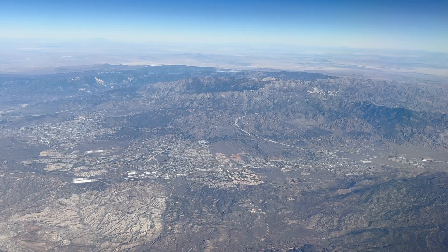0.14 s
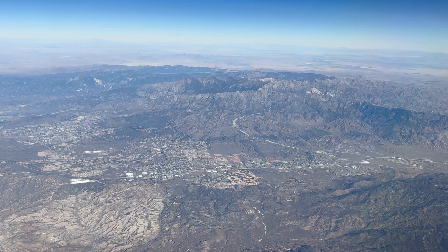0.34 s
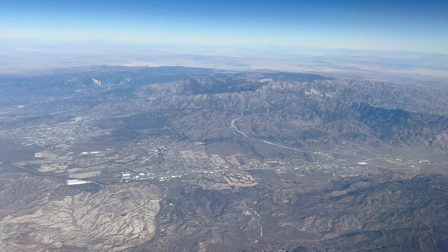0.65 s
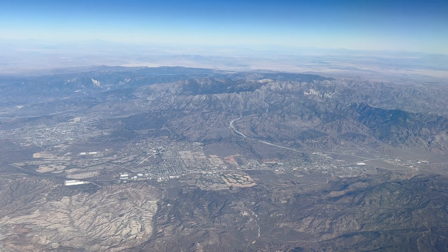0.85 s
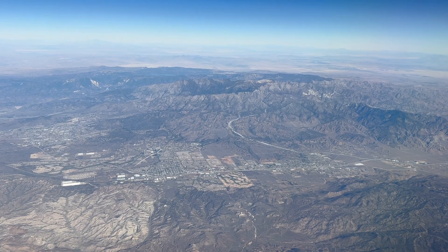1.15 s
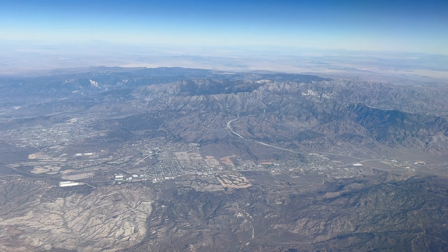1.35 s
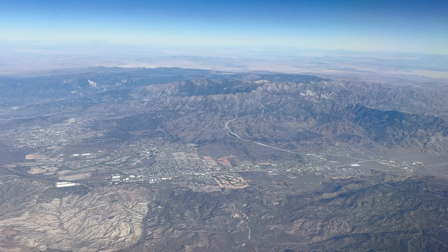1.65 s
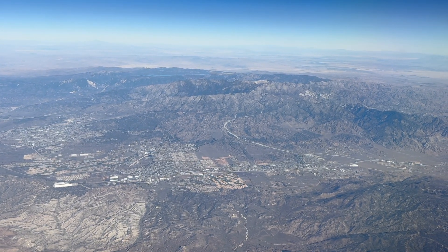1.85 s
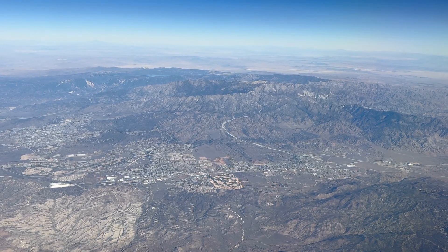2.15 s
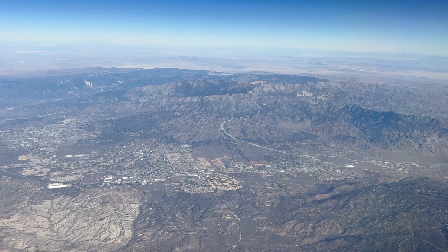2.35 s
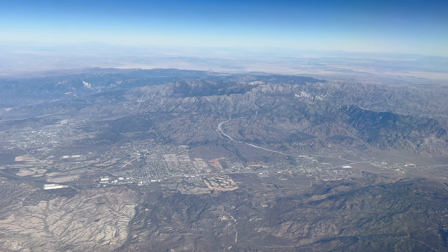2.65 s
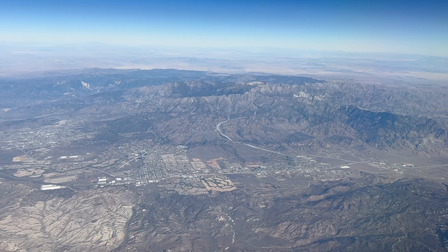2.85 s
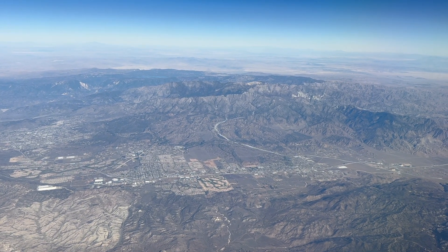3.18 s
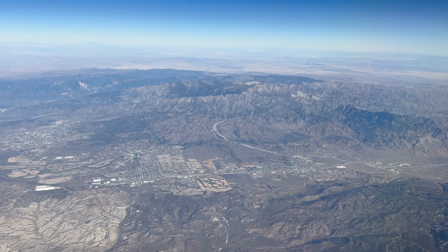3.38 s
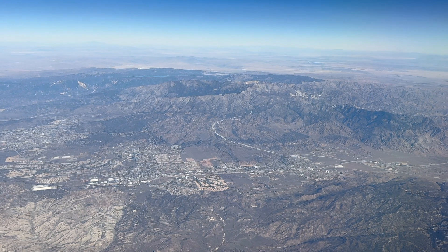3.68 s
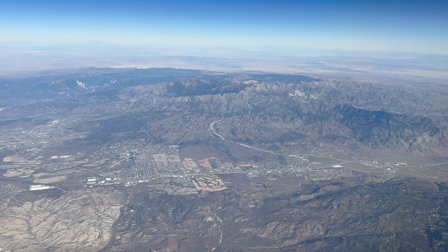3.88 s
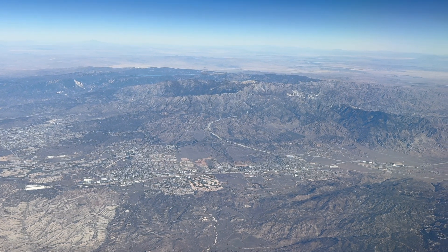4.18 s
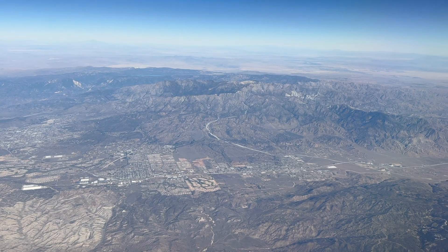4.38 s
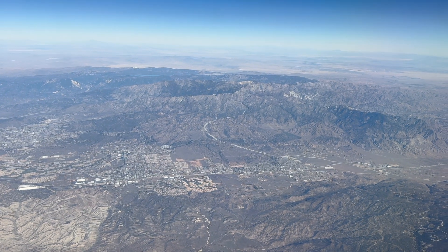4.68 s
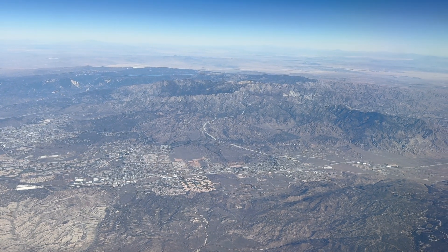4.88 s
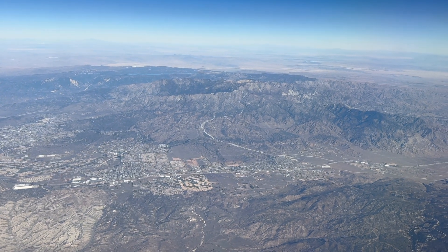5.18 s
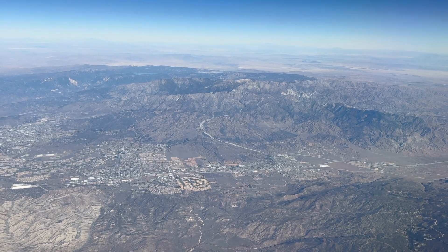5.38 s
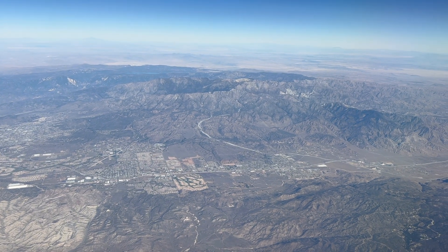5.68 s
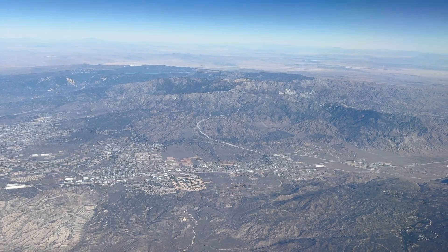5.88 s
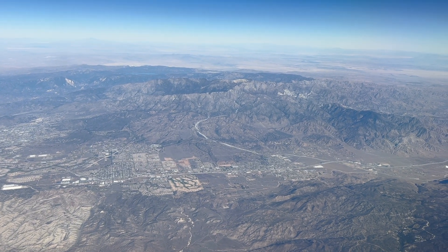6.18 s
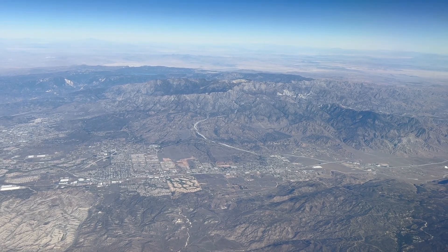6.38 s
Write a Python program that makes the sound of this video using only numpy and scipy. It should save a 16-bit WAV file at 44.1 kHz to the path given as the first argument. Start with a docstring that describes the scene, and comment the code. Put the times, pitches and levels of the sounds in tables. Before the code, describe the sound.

Inside a jet airliner at cruise, heard from a window seat, the airstream rumbles low and steady under droning engines, a high electrical whine, a slowly beating fan tone and soft vent hiss. Early on the fan tone dips briefly, then a sharp plastic click sounds close by. Everything fades down to silence and comes straight back up, with a few very faint clicks and clothing rustles.

```python
"""The airstream rumbles through an airliner's hull at cruise, on a stereo microphone at a window seat.
Around the seat, transformers on the 400 Hz supply whine, two cabin fans beat, engines drone, and the
vents hiss and whistle. Close by are a faint knock, plastic clicks, rustles of clothes and faint squeaks.
An electric load comes on for half a second: the whine swells and one fan sags.
The sound fades down to silence and straight back up, with a slightly different balance."""
import sys
import numpy as np
from scipy import signal
from scipy.fft import rfft, irfft, next_fast_len
from scipy.io import wavfile
from scipy.ndimage import map_coordinates

SR = 44100
rng = np.random.default_rng(int(sys.argv[2]) if len(sys.argv) > 2 else 0)


def persist_wave(psi):
    """Save psi, clipped to +-1, as 16-bit WAV."""
    counts = np.round(np.clip(psi, -1, 1) * 32767).astype(np.int16)
    wavfile.write(sys.argv[1], SR, np.atleast_2d(counts).T)


N = 287973
TIME = np.arange(N) / SR
FFT_SIZE = next_fast_len(N)
BIN_HZ = np.maximum(np.arange(FFT_SIZE // 2 + 1) * SR / FFT_SIZE, 1)

# Mid is common to both channels; side is opposite in them, and side_db is relative to mid.
# "Before" and "after" are the two sides of the fade's silent moment.
# faint squeaks near the seat: centre_s, length_s, level_db, pitch_hz
SQUEAKS = [(3.08, .12, -70, 3380), (6.44, .09, -68.5, 3940)]
# a faint, brief knock at the start, then rustles of clothes and seat fabric, close by:
# centre_s, length_s, level_db, centre_hz, width_octaves
KNOCK_AND_RUSTLES = [(0.055, .025, -58, 1350, .2), (0.11, .04, -62.5, 4700, .8), (2.51, .12, -74, 8000, .9),
                     (2.65, .03, -69, 8000, .9), (4.94, .11, -63.5, 4900, .22),
                     (5.17, .09, -67.5, 5500, 1.2), (5.38, .08, -64, 6000, 1.1),
                     (6.085, .022, -54.5, 3300, 1.2)]
# small plastic clicks, close by: start_s, level_db
CLICKS = [(1.8315, -53), (1.8385, -34.5), (2.089, -58), (3.61, -60), (4.912, -51), (5.735, -58)]
# spectrum of the clicking plastic: frequency_hz, relative_db
CLICK_SPECTRUM = [(700, -10), (1800, 2), (2700, -1), (3500, 2), (4500, -5), (6500, -2), (7700, -8),
                  (11000, -7), (12300, -3), (13500, -14), (14700, -8), (16000, -14)]
# air system whistles, the lowest two beating: pitch_hz, before_db, after_db
WHISTLES = [(1480.5, -61, -69), (1486.5, -66, -63), (2598, -75.5, -80), (3940, -83, -83), (5911, -87, -91)]
# spectrum of the vents at the seat: frequency_hz, relative_db
VENT_SPECTRUM = [(300, -20), (700, -1), (850, 3.5), (1200, -.5), (1700, -4), (2300, -7.7), (3000, -9.7),
                 (4000, -14.5), (4600, -15.3), (5500, -18.8), (7000, -23.3), (9000, -26.8), (11500, -28.5),
                 (12200, -26.8), (13000, -29.6), (16000, -30.8)]
# stereo width of the vents: frequency_hz, side_db
VENT_SIDE = [(700, -7), (2000, -6), (5000, -6), (12000, -4.2)]
# engine drones and duct resonances: centre_hz, width_hz, before_db, after_db, side_db
DRONES = [(92.5, 21, -36, -50, -10), (171.2, 5.7, -40.5, -38, -19.5), (203.9, 5.6, -40, -45, -12.5),
          (249.7, 3.8, -40.5, -43.5, -5.5), (300, 36, -44.5, -52, -10), (370.3, 2.1, -49, -53.5, 2.5),
          (418.1, 5, -49, -55.5, -9.5), (471.5, 14, -53.5, -65, -6), (1479.4, 42, -58.5, -59.5, -3),
          (2140, 1500, -70, -65.5, -8.5), (2982, 39, -76.5, -72, -3)]
# transformer overtones, relative to the second harmonic: supply_multiple, before_db, after_db
WHINE_OVERTONES = [(3, -25, -26), (4, -23.3, -25.5), (5, -27, -28.5), (6, -36.5, -33.5), (7, -43, -48),
                   (8, -39.5, -46), (9, -41, -48), (10, -33.5, -40.5), (11, -50, -45), (12, -58, -45.5),
                   (13, -42.5, -45.5), (14, -41.5, -44), (15, -43.5, -49), (16, -52, -55), (18, -53.5, -60)]
# spectrum of the airstream from inside the hull: frequency_hz, relative_db
AIRSTREAM_SPECTRUM = [(20, -59.5), (36, -41), (44, -6), (57, -3.5), (95, 1), (135, 3), (205, -.5),
                      (228, -5.5), (300, -8), (345, -11), (480, -16.5), (540, -23), (700, -27),
                      (1100, -68.5)]
# stereo width of the airstream: frequency_hz, side_db
AIRSTREAM_SIDE = [(40, -23.5), (90, -16), (150, -15), (210, -16), (270, -9.5), (400, -8), (480, -7.5),
                  (700, 1)]

LOAD_ON_S, LOAD_OFF_S = 0.685, 1.2
SILENT_S, FADE_OUT_S, FADE_IN_S = 4.724, 1.87, 1.225


def from_db(db):
    """Decibels to gain."""
    return 10 ** (np.asarray(db) / 20)


def before_after(before, after):
    """One value up to the silent moment, another from there on."""
    return np.where(TIME < SILENT_S, before, after)


def settle(start_s, lag_s):
    """A step from 0 to 1, followed with a lag."""
    return 1 - np.exp(-np.maximum(TIME - start_s, 0) / lag_s)


def swell(centre_s, length_s):
    """A smooth rise and fall around one moment."""
    return np.exp(-np.minimum(2 * ((TIME - centre_s) / length_s) ** 2, 20))


def colour(points):
    """Gain at every frequency, from (frequency_hz, level_db) points on a log axis."""
    hz, db = np.transpose(points)
    return from_db(np.interp(np.log(BIN_HZ), np.log(hz), db))


def noise(spectrum, side_gain):
    """Stereo noise of a given spectrum: a mid part of rms 1, plus a side part for width."""
    mid_bins, side_bins = rfft(rng.standard_normal((2, FFT_SIZE))) * spectrum
    mid = irfft(mid_bins, FFT_SIZE)[:N]
    side = irfft(side_bins * side_gain, FFT_SIZE)[:N]
    return np.array([mid + side, mid - side]) / np.std(mid)


def tone(hz, pan_db, lead_rad):
    """A sine along a pitch curve; standing waves give the two channels unlike levels and phases."""
    phase = 2 * np.pi * np.cumsum(hz * np.ones(N)) / SR
    channels = np.array([[.5], [-.5]])
    return np.sqrt(2) * from_db(pan_db * channels) * np.sin(phase + lead_rad * channels)


def drift(rate_hz):
    """A smooth random wander with a spread of 1."""
    knots = rng.standard_normal(1000)
    coarse_s = TIME[::100]
    wander = map_coordinates(knots, [coarse_s * 2 * rate_hz], order=3, mode="wrap")
    return np.interp(TIME, coarse_s, wander / np.std(wander))


def click_envelope(t60_s, rise_s):
    """Jumps up and dies away at every click."""
    out = np.zeros(N)
    for start_s, level_db in CLICKS:
        age_s = np.maximum(TIME - start_s, 0)
        decay = np.exp(-np.minimum(np.log(1000) * age_s / t60_s, 20))
        out += from_db(level_db) * settle(start_s, rise_s) * decay
    return out


def electric_load(sag_s=0.08, recover_s=0.025):
    """How far the load drags on the generator and the main fan, from 0 to 1."""
    return settle(LOAD_ON_S, sag_s) * (1 - settle(LOAD_OFF_S, recover_s))


def squeaks(rise_hz_per_s=900, wobble_hz=7.7):
    """Thin, unsteady tones glide upward, a little left of the microphone."""
    out = 0
    for centre_s, length_s, level_db, pitch_hz in SQUEAKS:
        glide_hz = pitch_hz + rise_hz_per_s * (TIME - centre_s) + wobble_hz * drift(40)
        out += from_db(level_db) * swell(centre_s, length_s) * tone(glide_hz, pan_db=3, lead_rad=0)
    return out


def knock_and_rustles():
    """A faint, brief knock, then rustles of clothes and seat fabric: each a swell of band noise."""
    out = 0
    for centre_s, length_s, level_db, centre_hz, width_octaves in KNOCK_AND_RUSTLES:
        band = 1 / (1 + (np.log2(BIN_HZ / centre_hz) / width_octaves) ** 2) ** 2
        out += from_db(level_db) * swell(centre_s, length_s) * noise(band, side_gain=0.43)
    return out


def clicks(ring_db=-10.5, dull_hz=6000):
    """Plastic cracks sharply close by, then the wall panels give a short, duller ring."""
    bright = colour(CLICK_SPECTRUM)
    dull = bright / (1 + (BIN_HZ / dull_hz) ** 2)
    crack = click_envelope(t60_s=.013, rise_s=0.00031) * noise(bright, side_gain=.5)
    ring = click_envelope(t60_s=.075, rise_s=0.0014) * noise(dull, side_gain=0.64)
    return crack + from_db(ring_db) * ring


def whistles(flutter_db=1.0):
    """The air system gives off faint pure tones that flutter a little."""
    out = 0
    for pitch_hz, before_db, after_db in WHISTLES:
        level_db = before_after(before_db, after_db) - flutter_db * drift(5.3)
        whistle = tone(pitch_hz, pan_db=rng.normal(0, 0.36), lead_rad=rng.normal(0, 0.26))
        out += from_db(level_db) * whistle
    return out


def vents(level_db=-55.8):
    """The air supply hisses smoothly, spread wide around the seat."""
    return from_db(level_db) * noise(colour(VENT_SPECTRUM), colour(VENT_SIDE))


def cabin_fans(sag_hz=17.15, sag_db=2.5, flutter_db=0.52, second_hz=900.9, second_db=-58.5):
    """Two blade tones a couple of hertz apart beat slowly; the main fan slows and softens under load."""
    load = electric_load()
    main_hz = before_after(898.85, 899.25) - sag_hz * load
    main_db = before_after(-46.5, -45.5) - sag_db * load + flutter_db * drift(14)
    main_fan = from_db(main_db) * tone(main_hz, pan_db=-4.0, lead_rad=0.63)
    second_fan = from_db(second_db) * tone(second_hz, pan_db=-0.5, lead_rad=0.79)
    return main_fan + second_fan


def power_whine(level_db=-38.5, swell_db=1.1, sag_hz=0.6, wander_hz=0.075):
    """Transformers sing at twice the supply frequency, louder under load, with less steady overtones."""
    flutter_db, overtone_flutter_db = 0.28, 1.1
    load = electric_load()
    supply_hz = before_after(402.75, 403.3) - sag_hz * load + wander_hz * drift(1)
    hum_gain = from_db(swell_db * load + flutter_db * drift(14))
    out = hum_gain * tone(2 * supply_hz, pan_db=2.4, lead_rad=0.14)
    for multiple, before_db, after_db in WHINE_OVERTONES:
        overtone_db = before_after(before_db, after_db) + overtone_flutter_db * drift(8)
        overtone = tone(multiple * supply_hz, pan_db=rng.normal(.5, 0.82), lead_rad=rng.normal(0, 0.34))
        out += from_db(overtone_db) * overtone
    return from_db(level_db) * out


def drones():
    """Engines and ducts reach the seat as wavering resonances, their balance shifted after the fade."""
    out = 0
    for centre_hz, width_hz, before_db, after_db, side_db in DRONES:
        resonance = 1 / (1 + (2 * (BIN_HZ - centre_hz) / width_hz) ** 2)
        out += from_db(before_after(before_db, after_db)) * noise(resonance, from_db(side_db))
    return out


def airstream(before_db=-27.5, after_db=-29):
    """Turbulence shakes the hull beside the microphone; the lining lets only the lows through."""
    rumble = noise(colour(AIRSTREAM_SPECTRUM), colour(AIRSTREAM_SIDE))
    return from_db(before_after(before_db, after_db)) * rumble


def scene():
    """Everything that reaches the microphone at the window seat."""
    cabin = airstream() + vents() + power_whine() + cabin_fans() + drones() + whistles()
    return cabin + clicks() + knock_and_rustles() + squeaks()


def record(dry):
    """The fader runs linearly down to silence and back up; a steep low-pass cuts the highest treble."""
    ramp_s = before_after(FADE_OUT_S, FADE_IN_S)
    fader = np.minimum(np.abs(TIME - SILENT_S) / ramp_s, 1)
    cutoff_hz = 15750
    low_pass = signal.ellip(12, .1, 80, cutoff_hz, fs=SR, output="sos")
    return signal.sosfilt(low_pass, dry * fader)


dry = scene()
out = record(dry)
persist_wave(out)
```